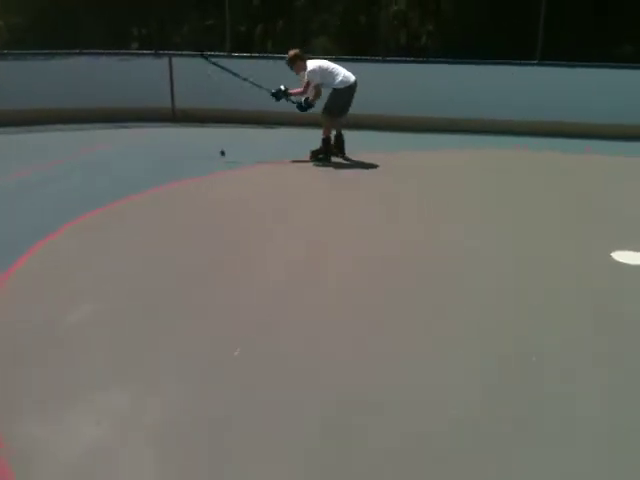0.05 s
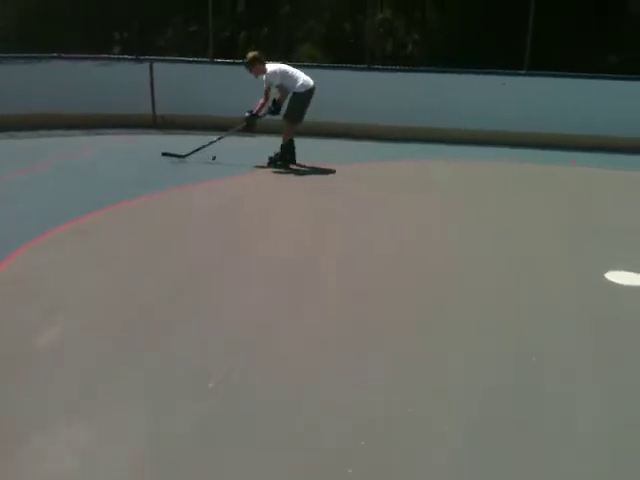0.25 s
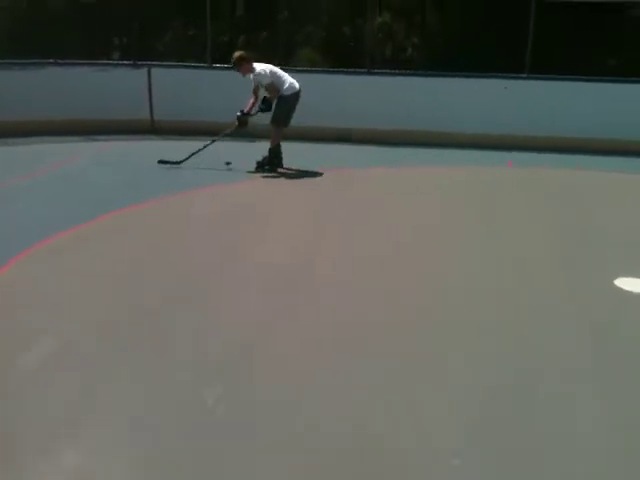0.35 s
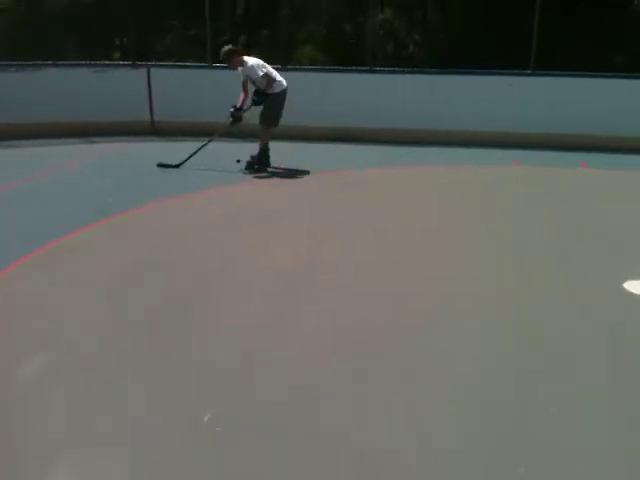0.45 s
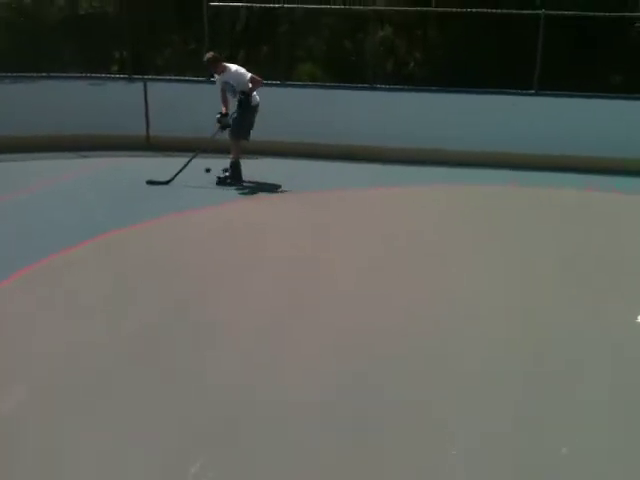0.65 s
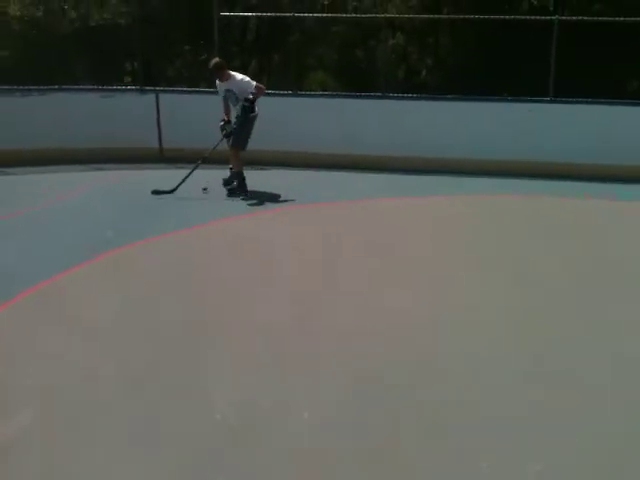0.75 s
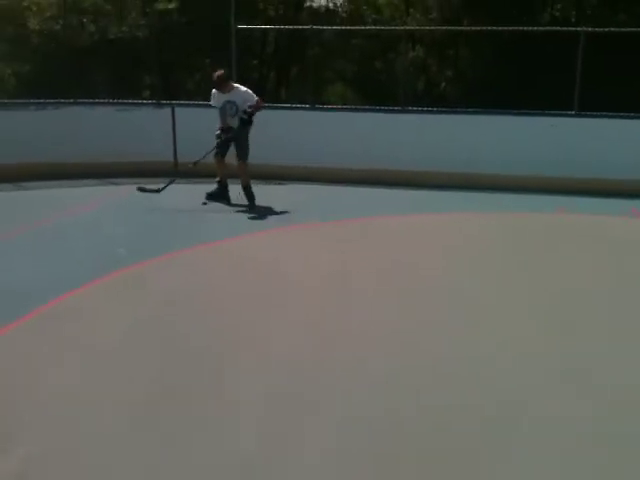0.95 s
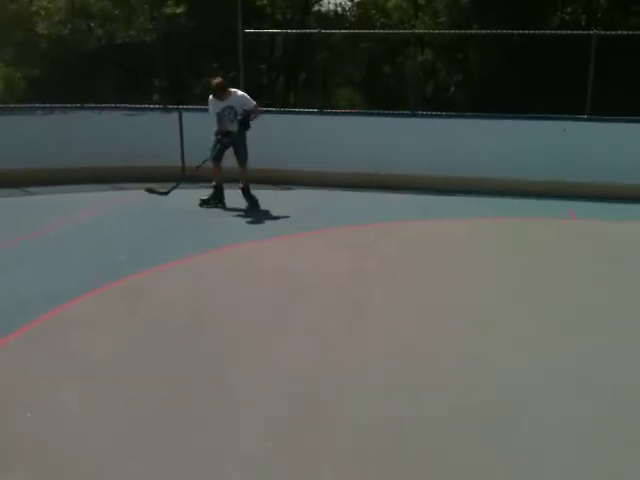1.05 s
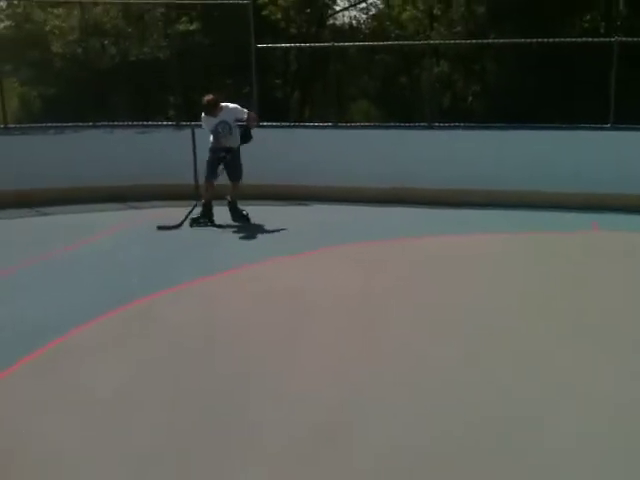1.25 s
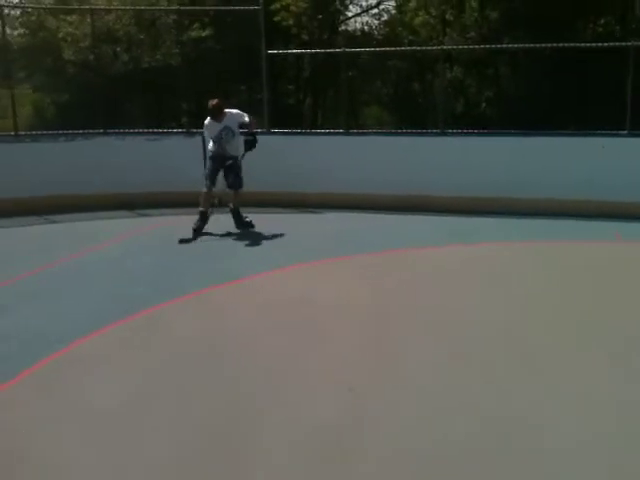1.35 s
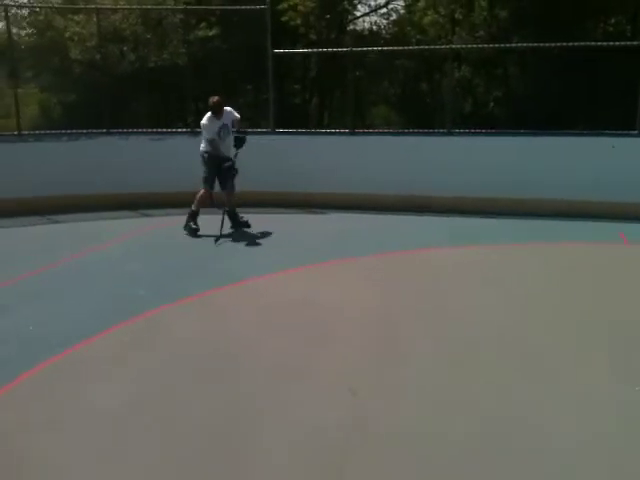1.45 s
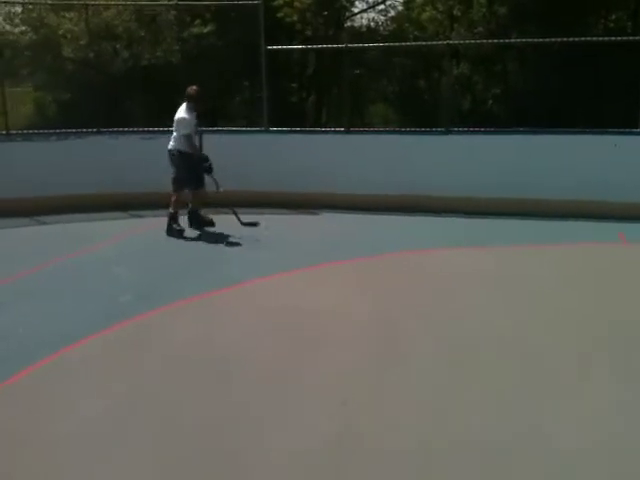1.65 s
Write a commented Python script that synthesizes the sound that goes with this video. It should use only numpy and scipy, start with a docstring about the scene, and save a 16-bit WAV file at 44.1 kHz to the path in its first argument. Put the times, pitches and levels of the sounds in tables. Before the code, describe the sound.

One sharp slap of a hockey stick runs straight into a hollow ball knock, with a faint echo around an outdoor rink. Softer blade taps, wheel ticks and skate clacks follow over a low rolling rumble and hiss.

```python
"""Slap shot on an outdoor roller rink

A stick's blade cracks on the court, scrapes along it and knocks the ball away. The boards and the
far surroundings echo the crack. The player rolls on: a wheel ticks once a turn, the blade taps
lightly, the skates clack down and scuff, and the wheels rumble and hiss underneath it all."""
import sys
import numpy as np
from scipy import signal
from scipy.fft import rfft, irfft, next_fast_len
from scipy.io import wavfile
from scipy.ndimage import map_coordinates

SR = 44100
rng = np.random.default_rng(int(sys.argv[2]) if len(sys.argv) > 2 else 0)


def to_wav(sig):
    """Store sig (one row per channel, or 1-D mono) as 16-bit WAV at the path in sys.argv[1].

    Samples outside -1..1 are clipped; the rate is SR.
    """
    pcm = np.clip(np.atleast_2d(sig), -1, 1) * 32767
    pcm = np.round(pcm).astype(np.int16)
    wavfile.write(sys.argv[1], SR, pcm.T)  # frames by channels


N = 74970  # 1.7 seconds


def amp(db):
    """Turn decibels into a gain to multiply by."""
    return 10 ** (np.asarray(db) / 20)


def unit(x):
    """Scale to an average power of 1."""
    return x / np.sqrt(np.mean(x ** 2) + 1e-20)


def along(points, hz):
    """Read between (frequency, value) points, with octaves evenly spaced."""
    freqs, values = np.transpose(points)
    return np.interp(np.log(hz + 1), np.log(freqs + 1), values)


def since(start):
    """Seconds since the start, zero before it."""
    return np.maximum(np.arange(N) / SR - start, 0)


def colour(x, tone, keep_power=True, size=4096):
    """Filter a sound so that each frequency is raised or lowered as a tone table says."""
    gain = amp(along(tone, np.fft.rfftfreq(size, 1 / SR)))
    cepstrum = irfft(np.log(unit(gain) if keep_power else gain))
    # fold it in half, so the filter never sounds ahead of its input
    cepstrum[1:size // 2] *= 2
    cepstrum[size // 2 + 1:] = 0
    return signal.fftconvolve(x, irfft(np.exp(rfft(cepstrum))))[:N]


def fade(t, t60):
    """Die away by 60 dB in t60 seconds, the fade time."""
    return np.exp(-np.log(1000) * t / t60)


def envelope(start, attack, hold, t60):
    """Rise, hold and die away; all times are in seconds."""
    return np.minimum(since(start) / attack, 1) * fade(since(start + attack + hold), t60)


def grit():
    """Noise of tiny contacts, equally strong and random in sign."""
    return np.sign(rng.standard_normal(N))


def wobble(rate):
    """A smooth curve through `rate` random values a second."""
    values = rng.standard_normal(int(N * rate / SR) + 4)
    return map_coordinates(values, [np.arange(N) * rate / SR])


def ring(notes, start, attack, in_step=False):
    """A struck object's fading notes: in step after a clean blow, out of step after a rough one."""
    t = since(start)
    sound = 0
    for hz, db, t60 in notes:
        gain = amp(db + rng.normal())
        phase = 0 if in_step else rng.random()
        sound += gain * fade(t, t60) * np.sin(2 * np.pi * (hz * t + phase))
    return np.minimum(t / attack, 1) * sound


# how the rumble and the hiss swell and sink (time [s], level [dB])
RUMBLE_LEVELS = [(0, -62), (.13, -65.5), (.175, -55), (.22, -64.5), (.45, -65), (.6, -62), (.8, -71),
                 (.92, -61.5), (1.0, -57.5), (1.061, -61.5), (1.13, -58.5), (1.22, -70), (1.28, -49.5),
                 (1.33, -53), (1.38, -59), (1.43, -56.5), (1.5, -59.5), (1.56, -49.5), (1.63, -58.5),
                 (1.7, -61)]
HISS_LEVELS = [(0, -55), (.2, -60.5), (.55, -57.5), (.7, -52.5), (.85, -58.5), (1.0, -56.5), (1.2, -57.5),
               (1.45, -57.5), (1.56, -59), (1.7, -55)]
# tone of each (frequency [Hz], level [dB])
RUMBLE_TONE = [(25, -8), (60, -25), (90, -8), (125, -1.5), (175, -0.5), (260, -10.5), (450, -19),
               (1500, -61)]
HISS_TONE = [(30, -32), (100, 2.5), (300, 2), (850, 3.5), (1400, 0.5), (2050, 3.5), (2700, -1.5),
             (3150, -3.5), (3950, 1), (4500, 1.5), (5700, -6), (7500, -11.5), (10000, -21.5),
             (15000, -19.5), (16500, -34)]

def rolling():
    """The rolling wheels make a low rumble and a fine, flickering hiss."""
    rumble_db = np.interp(since(0), *np.transpose(RUMBLE_LEVELS)) - 1.5
    rumble = unit(colour(rng.standard_normal(N), RUMBLE_TONE))
    hiss_db = np.interp(since(0), *np.transpose(HISS_LEVELS)) + 0.74 * wobble(90)
    hiss = colour(rng.standard_normal(N), HISS_TONE)
    return amp(rumble_db) * rumble + amp(hiss_db) * hiss


# how long sound lingers outdoors (frequency [Hz], fade time [s])
TAIL_FADES = [(150, 1), (700, 1.), (2000, 1), (5000, 0.74), (12000, 0.26)]
# tone of the lingering sound (frequency [Hz], level [dB])
TAIL_TONE = [(100, 0.5), (1400, -1.5), (1810, -3), (2100, 2.5), (5000, -1.5), (14000, -1.5)]

def open_air(x):
    """Sounds leave a faint tail in the open air; its treble dies first."""
    hz, t, spectrum = signal.stft(rng.standard_normal(N), SR, nperseg=256)
    spectrum = spectrum * fade(t, along(TAIL_FADES, hz)[:, None])
    tail = signal.istft(spectrum, SR, nperseg=256)[1]
    lingering = signal.fftconvolve(x, tail / np.linalg.norm(tail))[:N]
    return amp(-24) * colour(lingering, TAIL_TONE, keep_power=False)


def scatter(x, delay, spread):
    """A blurred echo: the sound's energy comes back late and smeared, its fine detail lost."""
    smear = envelope(delay, attack=0.0001, hold=0, t60=spread) ** 2
    energy = signal.fftconvolve(x ** 2, smear / smear.sum())[:N]
    return grit() * np.sqrt(np.abs(energy))


# echoes off the boards (delay [s], level [dB])
BOARD_ECHOES = [(0.0814, -24.5), (.0975, -21.5)]
# echoes from far away (delay [s], level [dB], spread [s])
FAR_ECHOES = [(0.145, -31.5, 0.075), (0.163, -35, .08), (0.2508, -32, 0.043), (0.276, -33.5, 0.067),
              (0.299, -32.5, 0.1), (0.324, -30, 0.24)]
# tone of each kind of echo (frequency [Hz], level [dB])
BOARD_TONE = [(60, -44), (150, -11), (250, -7), (375, 4), (500, -5), (630, 3.5), (780, -8), (1000, 2.5),
              (1400, -11), (1900, 0), (2750, 2.5), (3350, -14.5), (4350, 0.5), (5300, -16), (7000, -24),
              (10000, -39), (16000, -48)]
FAR_TONE = [(80, -12), (170, -3), (300, 0), (500, -2.5), (630, 5.5), (900, 5.5), (1300, -2.5), (1850, -1.5),
            (2600, -4.5), (3300, -18), (4200, -22), (7000, -26), (14000, -47)]

def echoes(x):
    """Sound bounces back twice off the boards, then later and duller from far away."""
    boards = sum(amp(db) * scatter(x, delay, spread=0.019) for delay, db in BOARD_ECHOES)
    far = sum(amp(db) * scatter(x, delay, spread) for delay, db, spread in FAR_ECHOES)
    return colour(boards, BOARD_TONE) + colour(far, FAR_TONE)


# wheel ticks and skate frame clicks (time [s], level [dB])
TICKS = [(.009, -36.5), (0.0569, -43), (0.1061, -47.5), (0.1481, -43.5), (.1755, -41), (0.2117, -38),
         (0.3732, -44), (.4072, -40.5), (.530, -39), (.608, -42), (0.6879, -40.5), (.732, -35.5),
         (0.7791, -37), (0.83, -48), (0.8992, -36.5), (0.9554, -41.5), (1.0042, -43), (1.0865, -39.5),
         (1.1346, -41.5), (1.1827, -44), (1.2776, -35), (1.327, -38), (1.4497, -44), (1.4864, -42),
         (1.542, -41), (1.6225, -42), (1.6535, -39)]
CLICKS = [(0.5625, -42.5), (0.5669, -42), (.5775, -47), (0.5893, -42.5), (0.8671, -30.5), (.948, -45.5),
          (1.3108, -40), (1.443, -42.5), (1.5352, -42.5), (1.5919, -32)]
# tone of each (frequency [Hz], level [dB])
TICK_TONE = [(200, -42), (1000, -26), (1800, 0), (2600, -4.5), (3150, -10), (3850, 4), (4500, -5.5),
             (5700, -7.5), (7500, -18), (10500, -28), (14500, -26.5), (16000, -41)]
CLICK_TONE = [(300, -17.5), (1200, -27), (2100, -8), (3200, -12), (4200, 2.5), (5500, -0.5), (7000, -9.5),
              (8500, -17.5), (11000, -32), (16000, -38)]
# notes a wheel rings with (frequency [Hz], level [dB], fade time [s])
WHEEL_NOTES = [(1900, -7, 0.0075), (2610, -6, 0.015), (3936, 2, 0.011)]

def wheels():
    """A wheel ticks and rings briefly at each turn; the skate frames click brightly."""
    ticks = sum(amp(db) * envelope(s, attack=0.00034, hold=0.0017, t60=0.013) for s, db in TICKS)
    rings = sum(amp(db) * ring(WHEEL_NOTES, s, attack=0.0012) for s, db in TICKS)
    clicks = sum(amp(db) * envelope(s, attack=0.0001, hold=0.00054, t60=0.014) for s, db in CLICKS)
    ticking = amp(-4.5) * colour(grit() * ticks, TICK_TONE) + amp(-2) * rings
    return ticking + colour(grit() * clicks, CLICK_TONE)


# skates landing (time [s], level [dB], thump level [dB])
LANDINGS = [(1.2962, -33.5, -63), (1.309, -32.5, -52), (1.5949, -32.5, -45), (1.6047, -33, -43.5),
            (1.609, -41.5, -50.5)]
# notes of the boot with its frame, and of the court (frequency [Hz], level [dB], fade time [s])
BOOT_NOTES = [(580, -7, 0.038), (786, -3, 0.049), (1140, -5.5, 0.035), (1358, 0, 0.027), (1777, -2, 0.037),
              (1915, 4.5, 0.043)]
COURT_NOTES = [(147, -6, 0.067), (202, 1.5, 0.056), (250, 8, 0.036)]
# wheels sliding sideways (time [s], level [dB], rise [s], hold [s], fade time [s])
SCUFFS = [(1.289, -47.5, 0.016, 0.021, 0.088), (1.367, -41, 0.0043, 0.0064, 0.13),
          (1.383, -46.5, 0.0038, 0.01, 0.1), (1.425, -51.5, 0.0028, 0.0028, 0.03),
          (1.668, -57.5, 0.0084, 0.024, .1)]
# tone of a clack and of a scuff (frequency [Hz], level [dB])
CLACK_TONE = [(60, -44), (150, -33), (400, -7.5), (580, 6), (800, 0), (1020, -17), (1350, 2), (1600, -13),
              (1930, 0.5), (2350, -7.5), (2750, -2.5), (3400, -6), (4200, -0.5), (5800, -3), (7500, -15.5),
              (10500, -36), (15000, -34)]
SCUFF_TONE = [(200, -25), (700, -8.5), (1300, -8.5), (1930, -2), (2400, -13.5), (3300, -14), (4150, -0.5),
              (4800, -4), (5600, 4), (6800, -7.5), (8200, -16.5), (11000, -27.5), (15000, -27)]

def skates():
    """Each skate clacks down, ringing the boot and thumping the court; its wheels scuff sideways."""
    clacks = boots = thumps = 0
    for s, db, thump_db in LANDINGS:
        clacks += amp(db) * envelope(s, attack=0.00014, hold=0.00091, t60=0.02)
        boots += amp(db - 11) * ring(BOOT_NOTES, s, attack=0.00034)
        thumps += amp(thump_db) * ring(COURT_NOTES, s, attack=0.0038)
    scuffs = sum(amp(db) * envelope(s, rise, hold, t60) for s, db, rise, hold, t60 in SCUFFS)
    roughness = amp(2.5 * wobble(320))
    landings = boots + thumps + amp(-2) * colour(grit() * clacks, CLACK_TONE)
    return landings + colour(grit() * roughness * scuffs, SCUFF_TONE)


# light taps of the blade (time [s], level [dB], treble limit [Hz])
TAPS = [(0.4315, -34, 3200), (0.8572, -26.5, 11000), (0.8714, -36.5, 9000), (0.8803, -40, 8050)]
# tone of a tap (frequency [Hz], level [dB])
TAP_TONE = [(100, -29), (450, -20), (750, -10), (1020, -10), (1330, -1), (1600, -6.5), (1930, 4),
            (2450, -3.5), (3400, -7.5), (4200, -1.5), (5800, -2.5), (7500, -8), (10500, -30), (15000, -43)]

def blade_taps():
    """The blade touches the court lightly: one dull tap, later three brighter ones."""
    taps = 0
    for s, db, limit_hz in TAPS:
        touch = grit() * envelope(s, attack=0.0001, hold=0.00047, t60=0.015)
        treble_cut = signal.butter(2, limit_hz, fs=SR, output="sos")
        taps += amp(db) * signal.sosfilt(treble_cut, touch)
    return colour(taps, TAP_TONE)


# tone of the scraping blade (frequency [Hz], level [dB])
SCRAPE_TONE = [(40, -21), (100, -17), (300, -11), (900, 0), (1500, -1), (2200, -5), (3400, -8), (4300, 1.5),
               (6300, -5), (7500, -16.5), (10000, -29), (13000, -31), (16000, -61)]

def blade_scrape():
    """The blade scrapes over the court on its way to the ball."""
    roughness = amp(1.4 * wobble(900))
    contact = envelope(start=0.2555, attack=0.0012, hold=0.0091, t60=0.046)
    return amp(-26.5) * colour(grit() * roughness * contact, SCRAPE_TONE)


# the blade meeting the ball (time [s], level [dB])
KNOCKS = [(0.2705, -15.5), (0.2785, -26.5)]
# notes of the ball on the blade (frequency [Hz], level [dB], fade time [s])
BALL_NOTES = [(650, -7.5, 0.066), (771, -3.5, 0.049), (875, 0.5, 0.045), (940, -7.5, 0.018),
              (1130, -12, 0.014), (1299, -13.5, 0.042), (1803, -11.5, 0.064)]
# tone of the thwack as they meet (frequency [Hz], level [dB])
THWACK_TONE = [(50, -57), (140, -41), (300, -14), (450, -25.5), (800, 0.5), (1400, -9), (2200, -6),
               (3200, -18), (4100, -10.5), (6000, -33), (10000, -50), (16000, -69)]

def ball():
    """The blade catches the ball with a hollow knock and nudges it once more."""
    contact = sum(amp(db) * envelope(s, attack=0.0003, hold=0.0015, t60=0.022) for s, db in KNOCKS)
    hollow = sum(amp(db) * ring(BALL_NOTES, s, attack=0.001, in_step=True) for s, db in KNOCKS)
    return amp(-2) * colour(grit() * contact, THWACK_TONE) + amp(1.5) * hollow


# the blade hitting the court (time [s], level [dB], contact length [s])
SLAPS = [(0.2396, -18, 0.0016), (0.2418, -12, .0058), (.2500, -18.5, 0.0017)]
# tone of the crack, and of the snap that starts the hardest hit (frequency [Hz], level [dB])
CRACK_TONE = [(40, -24), (90, -30), (160, -15.5), (350, -7), (1000, -8), (1250, 3.5), (1480, -14.5),
              (1900, -1.5), (3000, 0.5), (3550, -27.5), (4400, 2), (5700, -6), (7500, -17), (9500, -22),
              (11300, -49), (14000, -31), (16000, -41)]
SNAP_TONE = [(300, -17), (2800, -21), (4500, 2), (6000, 6), (7500, -12.5), (9500, -18), (11300, -37),
             (14000, -24), (16000, -42)]
# notes the stick rings with (frequency [Hz], level [dB], fade time [s])
STICK_NOTES = [(631, -19, 0.11), (770, -14.5, 0.019), (1261, -9.5, 0.041), (1814, 5.5, 0.033),
               (2230, -26, 0.025), (2506, -3, 0.032), (2630, -11, 0.031), (2670, -14, 0.024),
               (3200, -13, 0.042), (4110, -15, 0.036), (4930, -23, 0.027), (5580, -19, 0.028)]

def slap():
    """The blade lands heel to toe with a crack; the hardest hit adds a snap and rings the stick."""
    contact = sum(amp(db) * envelope(s, attack=0.00015, hold=hold, t60=0.011) for s, db, hold in SLAPS)
    crack = colour(grit() * contact, CRACK_TONE)
    hardest_s, hardest_db, _ = max(SLAPS, key=lambda row: row[1])
    snap = colour(grit() * envelope(hardest_s, attack=0.0001, hold=0.00096, t60=0.0069), SNAP_TONE)
    stick = ring(STICK_NOTES, hardest_s, attack=0.0032)
    return amp(-4.5) * crack + amp(-12) * snap + amp(hardest_db + 3) * stick


def scene():
    """The shot and the skates in one channel; only the slap is loud enough for distinct echoes."""
    blow = slap()
    near = blow + blade_scrape() + ball() + blade_taps() + wheels() + skates()
    return (near + echoes(blow) + open_air(near) + rolling())[None]


def record(dry):
    """Cut away the deep bass and the very highest treble."""
    low_cut_hz, top_hz = 49, 16000
    thinned = signal.sosfilt(signal.butter(2, low_cut_hz, "high", fs=SR, output="sos"), dry)
    size = next_fast_len(N + SR // 2)
    kept = np.fft.rfftfreq(size, 1 / SR) < top_hz
    return irfft(rfft(thinned, size) * kept, size)[..., :N]


dry = scene()
out = record(dry)
to_wav(out)
```